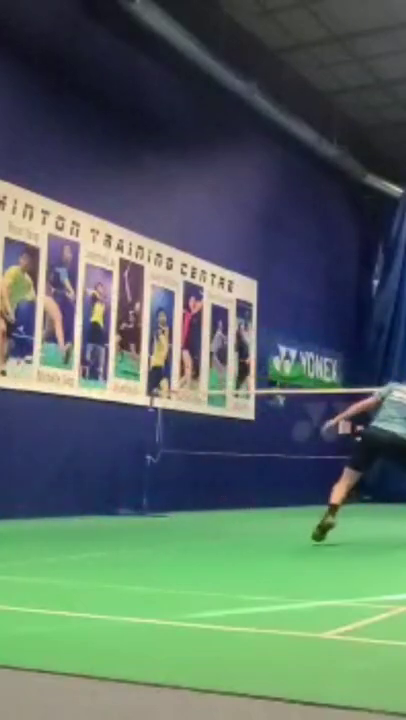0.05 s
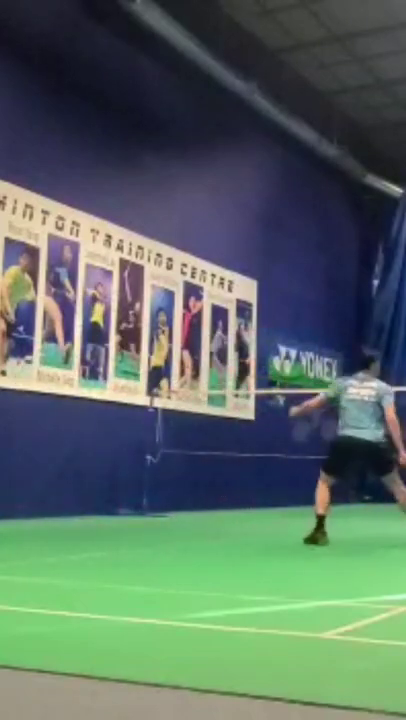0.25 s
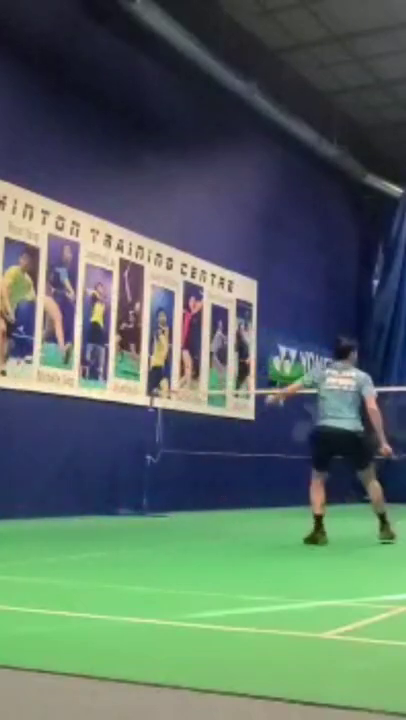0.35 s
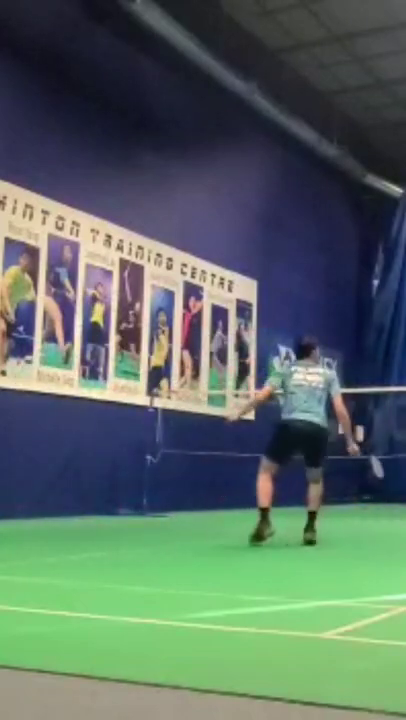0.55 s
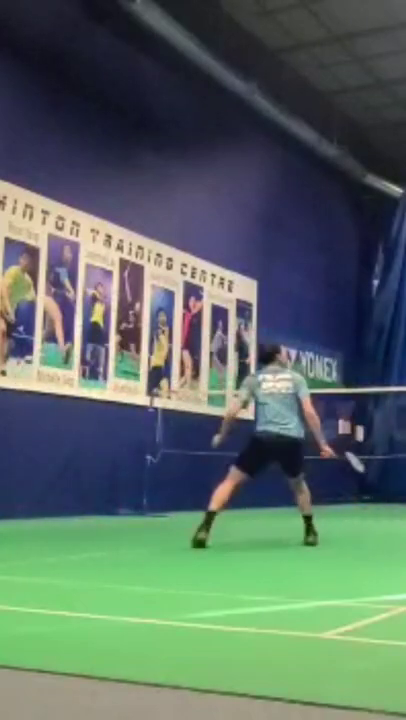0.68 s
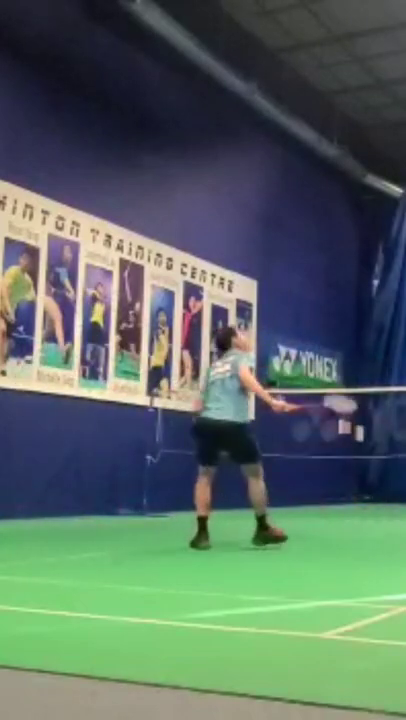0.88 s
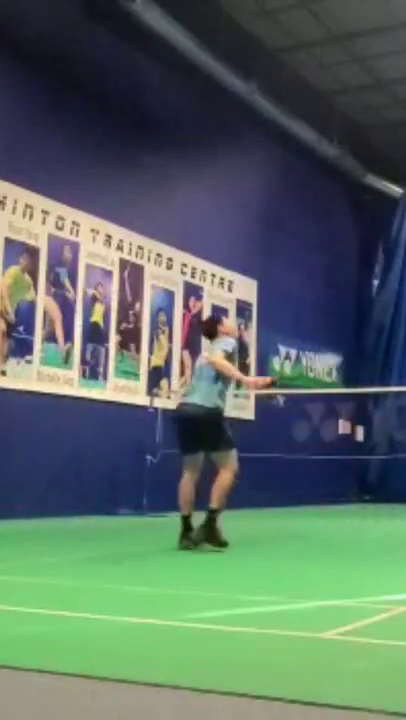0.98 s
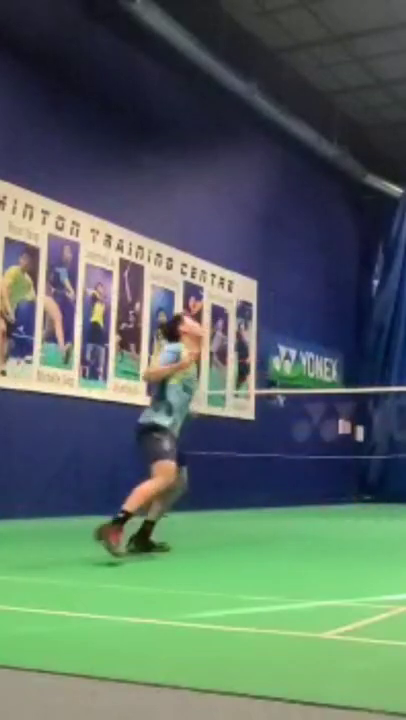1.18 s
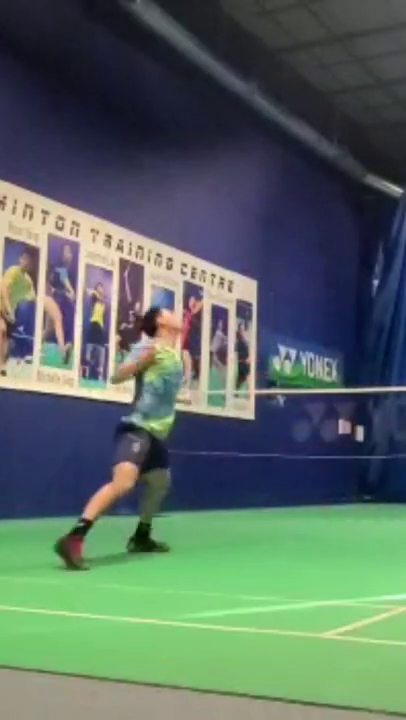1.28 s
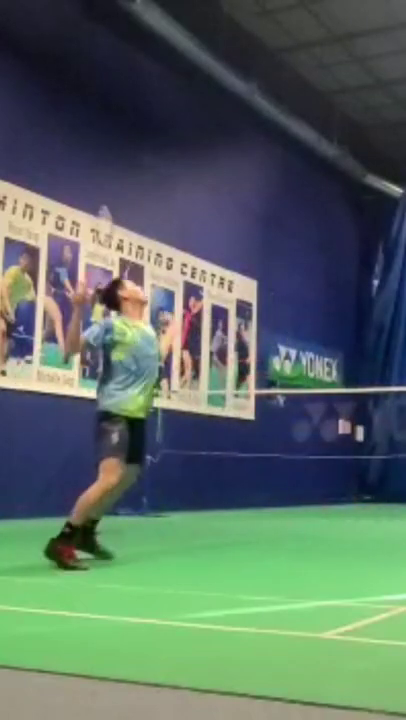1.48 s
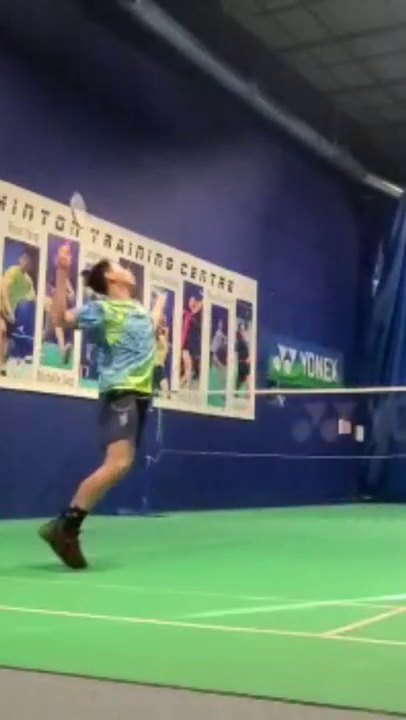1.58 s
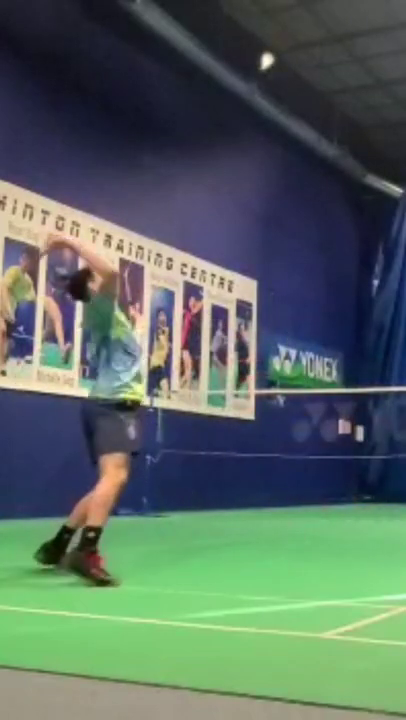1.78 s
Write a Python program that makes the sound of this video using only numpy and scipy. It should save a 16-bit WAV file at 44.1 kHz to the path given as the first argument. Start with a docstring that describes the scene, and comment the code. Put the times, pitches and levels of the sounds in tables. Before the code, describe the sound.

Rubber soles squeak twice on a sports hall floor, with footfalls and a badminton racket hit in between. Softer steps and a faint scuff follow, all ringing in the reverberant room while ventilation rumbles quietly.

```python
"""Footwork in an indoor sports hall. Ventilation rumbles throughout; at the start the strings of an
earlier stroke still ring. A rubber sole sticks and slips in a squeak at 0.2 s, then feet thud.
At 0.65 s a racket knocks over a faint squeak. Soles brush the floor, squeak longer at 1.2 s,
then thud and brush again. The hall answers each with early echoes and a long tail,
and a gain control ducks the loud moments."""
import sys
import numpy as np
from scipy import signal
from scipy.fft import irfft
from scipy.io import wavfile
from scipy.ndimage import uniform_filter1d

SR = 44100
rng = np.random.default_rng(int(sys.argv[2]) if len(sys.argv) > 2 else 0)


def put_to_file(sound):
    """Save the sound as 16-bit audio at rate SR, in the file named by the first command-line argument."""
    columns = np.atleast_2d(sound).T  # one column per channel
    safe = np.clip(columns, -1, 1)
    whole_steps = np.round(safe * 32767)
    wavfile.write(sys.argv[1], SR, whole_steps.astype(np.int16))


N = 81585


def amp(db):
    return 10 ** (np.asarray(db) / 20)


def unit_rms(x):
    return x / np.sqrt(np.mean(x ** 2) + 1e-20)


def at_hz(table, hz):
    f, value = np.transpose(table)
    return np.interp(np.log(hz + 1), np.log(f + 1), value)


def add(mix, start_s, sound):
    part = mix[round(start_s * SR):][:len(sound)]
    part += sound[:len(part)]


def eq_taps(table, scale=1):
    gain_db = scale * at_hz(table, np.fft.rfftfreq(256, 1 / SR))
    return np.fft.fftshift(irfft(amp(gain_db)))


# Diffuse field: f/Hz, left-right coherence
COHERENCE = [(50, 0.97), (150, 0.89), (300, 0.84), (600, 0.1), (1500, 0.092), (10000, 0.033)]


def diffuse_noise(frame):
    """Stereo noise spectra, alike in the bass and independent in the treble."""
    f, t, (left, other) = signal.stft(rng.standard_normal((2, N)), SR, nperseg=frame)
    shared = np.clip(at_hz(COHERENCE, f), 0, 1)[:, None]
    return f, t, np.array([left, shared * left + np.sqrt(1 - shared ** 2) * other])


# Rumble spectrum: f/Hz, relative level/dB
RUMBLE = [(12, -37), (20, -8.5), (64, -1.5), (147, -16.5), (655, -17), (1050, -23), (1200, -19.5),
          (1880, -25), (2210, -21.5), (3640, -30), (5370, -39.5), (11700, -52), (15000, -97)]
# Hum tones: f/Hz, level/dB
HUM_TONES = [(73, -50.5), (120, -51.5)]


def ventilation(rumble_db=-45):
    """Air rumble and far hall noise with a wavering hum."""
    f, _, spectra = diffuse_noise(2048)
    rumble = signal.istft(spectra * amp(at_hz(RUMBLE, f))[:, None], SR, nperseg=2048)[1][:, :N]
    hum = sum(amp(db) * wavering_tone(hz) for hz, db in HUM_TONES)
    return amp(rumble_db) * unit_rms(rumble) + hum


def wavering_tone(hz):
    drift_rad = 0.015 * np.cumsum(rng.standard_normal(N))
    return np.sin(2 * np.pi * hz * np.arange(N) / SR + drift_rad)


def lingering_strings(hz=1185, db=-49.5, t60_s=1.2):
    """Strings of an earlier stroke dying away in the hall."""
    t = np.arange(N) / SR
    return amp(db - 60 * t / t60_s) * np.array([wavering_tone(hz), wavering_tone(hz)])


# One curve per squeak: t/s, slip f/Hz, level/dB, overtone lift/dB (clipped to +-6)
SQUEAK_CURVES = [
    [(.209, 2200, -48, 6), (.216, 2290, -28, 5), (.2195, 2340, -17, -1), (.2235, 2400, -11, -5),
     (.2255, 2640, -17, -2), (.228, 2540, -9, -2), (.2335, 2520, -23, 5), (.241, 2440, -38, 3)],
    [(.658, 1895, -52, -8), (.668, 1970, -46, 32), (.69, 1966, -42.5, -8), (.71, 1960, -58, -3)],
    [(1.177, 1864, -64, -5), (1.182, 1954, -38.5, 15.5), (1.19, 1906, -34.5, -33), (1.195, 1843, -54, -13),
     (1.201, 1985, -62, 2), (1.212, 1880, -63, 6)],
    [(1.181, 2544, -27, 5), (1.188, 2430, -28.5, -19), (1.196, 2339, -22.5, -15), (1.212, 2424, -18, -15.5),
     (1.224, 2508, -14, 3.5), (1.236, 2766, -23.5, 9.5), (1.25, 2698, -24, -3.5), (1.264, 2700, -24, -3),
     (1.28, 2773, -24, -10), (1.3, 2792, -27, 2)],
]
# One row per squeak, harmonics 2, 3, ...: level/dB re fundamental, before lift
SQUEAK_OVERTONES = [
    [-13, -22, -29, -31.5],
    [-11, -48],
    [-1.5, -3, -18, -41, -31],
    [-10, -17, -19.5, -12.5, -20],
]


def squeak(curve, overtones_db, wobble=0.012, chatter_db=3, grit_db=-19, fade_s=0.0012):
    """Stick-slip of rubber: a gliding, chattering harmonic stack with rubbing noise."""
    times_s, hz, db, lift_db = np.transpose(curve)
    t = np.arange(times_s[0], times_s[-1], 1 / SR)
    noise = rng.standard_normal((3, len(t)))
    waver, grab = (unit_rms(uniform_filter1d(uniform_filter1d(v, 80), 80)) for v in noise[:2])
    phase = 2 * np.pi * np.cumsum(np.interp(t, times_s, hz) * (1 + wobble * waver)) / SR
    overtones = sum(amp(d) * np.sin((k + 2) * phase + k) for k, d in enumerate(overtones_db))
    grit = amp(grit_db + max(overtones_db)) * noise[2] * (1 + np.sin(phase))
    lift = amp(np.clip(np.interp(t, times_s, lift_db), -6, 6))
    fade = np.clip(np.minimum(t - times_s[0], times_s[-1] - t) / fade_s, 0, 1)
    envelope = fade * amp(np.interp(t, times_s, db) + chatter_db * grab)
    return envelope * np.sqrt(2) * (np.sin(phase) + lift * (overtones + grit))


# Foot and racket impacts: t/s, level/dB, body f/Hz, then re body: crack/dB, ring/dB, tick/dB
IMPACTS = [(0.29, -25, 386, -8, -39, -60), (0.308, -31, 600, -20, -46, -47),
           (.327, -32.5, 500, -9, -41, -50), (.345, -24.5, 840, -32, -43, -56),
           (.635, -24.5, 520, -5, -45, -12.5), (0.6557, -21.5, 454, -15, -7, -30),
           (.6583, -21, 680, -24, -24, -40), (.672, -26.5, 1080, -11, -41, -36),
           (0.741, -32.5, 436, -30, -33, -50), (1.173, -49, 190, -22, -37, -50),
           (1.385, -35.5, 231, -36, -40, -50), (1.422, -26, 720, -33, -36, -50),
           (1.504, -60.5, 789.7, -33, -31, -42), (1.764, -37, 308, -32, -54, -50)]
# Racket string modes: f/Hz, level/dB re ring, t60/s
STRING_MODES = [(1262, -1, 0.043), (754, -13, 0.028)]


def thud(db, body_hz, crack_db, ring_db, tick_db, crack_hz=3180, crack_s=0.012, tick_s=0.00084):
    """One push and rebound of air, a crack, a bright tick and a string ring, strong for the racket."""
    t = np.arange(4000) / SR
    half_cycles = 2 * body_hz * t
    body = np.sin(np.pi * half_cycles) * np.exp(-(half_cycles / 1.74) ** 2)
    body *= np.minimum(2 * half_cycles, 1)
    dull_noise = signal.lfilter(*signal.butter(1, crack_hz, fs=SR), rng.standard_normal(len(t)))
    crack = amp(crack_db) * dull_noise * np.exp(-t / crack_s)
    tick = amp(tick_db) * np.diff(rng.standard_normal(len(t) + 1)) * np.exp(-t / tick_s)
    ring = sum(amp(ring_db + mode_db - 60 * t / t60_s) * np.sin(2 * np.pi * hz * t)
               for hz, mode_db, t60_s in STRING_MODES)
    return amp(db) * (body + crack + ring + tick)


# Sole brushes: t/s, length/s, level/dB
SOLE_SCUFFS = [(0.802, .07, -64), (1.037, 0.1, -71), (1.61, 0.25, -55.5)]


def scuff(length_s, db, highpass_hz=6030):
    """A sole brushes the floor: grainy hiss that rises quickly and trails off."""
    progress = np.linspace(0, 1, round(length_s * SR))
    grains = rng.standard_normal(len(progress)) * amp(3.6 * rng.exponential(1, len(progress)))
    hiss = signal.sosfilt(signal.butter(2, highpass_hz, "high", fs=SR, output="sos"), grains)
    return amp(db) * unit_rms(hiss) * np.sin(np.pi * np.sqrt(progress))


# Source balance: f/Hz, left minus right/dB
BALANCE = [(300, 0.5), (2500, 0.5), (5000, 12), (9000, 4), (13000, 3.5)]
# Early echoes: delay/s, left/dB, right/dB, right lag/samples
EARLY_ECHOES = [(.0045, -9, -9, 3), (.012, -12, -9, -8), (.0195, -1, -7, 12), (.031, -13, -9, -15)]
# Tail decay: f/Hz, t60/s
TAIL_DECAY = [(100, 0.4), (400, 0.77), (1200, 1.2), (2500, 1.387), (5000, 1.25), (8000, 0.7), (13000, 0.42)]
# Tail spectrum: f/Hz, relative level/dB
TAIL_SPECTRUM = [(300, 2), (2500, -2), (6000, 0.5), (10000, 1), (14000, -6.5)]


def hall(x, wet_db, echo_db=0, right_lag_samples=4, tail_rise_s=0.019, tail_lean=0.42):
    """Direct sound leaning left, early echoes, then a diffuse tail dying band by band."""
    left, right = (signal.oaconvolve(x, eq_taps(BALANCE, side), "same") for side in (0.5, -0.5))
    early = np.array([left, np.roll(right, right_lag_samples)])
    for delay_s, left_db, right_db, lag_samples in EARLY_ECHOES:
        add(early[0], delay_s, amp(left_db + echo_db) * left)
        add(early[1], delay_s + lag_samples / SR, amp(right_db + echo_db) * right)
    f, t, spectra = diffuse_noise(512)
    spectra *= amp(at_hz(TAIL_SPECTRUM, f)[:, None] - 60 * t / at_hz(TAIL_DECAY, f)[:, None])
    spectra *= amp(np.outer([0.5, -0.5], tail_lean * at_hz(BALANCE, f)))[:, :, None]
    tail = signal.istft(spectra, SR, nperseg=512)[1][:, :N]
    tail *= np.minimum(np.arange(N) / SR / tail_rise_s, 1) ** 2
    tail *= np.sqrt(2) / np.linalg.norm(tail)
    return early + amp(wet_db) * signal.fftconvolve(x[None], tail, axes=1)[:, :N]


def scene():
    """Soles and impacts in the hall, over the ventilation and the lingering strings."""
    soles, impacts = np.zeros((2, N))
    for curve, overtones_db in zip(SQUEAK_CURVES, SQUEAK_OVERTONES):
        add(soles, curve[0][0], squeak(curve, overtones_db))
    for start_s, length_s, db in SOLE_SCUFFS:
        add(soles, start_s, scuff(length_s, db))
    for start_s, *impact in IMPACTS:
        add(impacts, start_s, thud(*impact))
    play = hall(soles, wet_db=3) + hall(impacts, wet_db=4.5, echo_db=-7)
    return play + ventilation() + lingering_strings()


def gain_control(x, knee_db=-28.5, slope=0.23, sense_s=0.051, release_db_per_s=63):
    """Ducks both channels by a share of the held level above the knee."""
    pole = np.exp(-1 / (sense_s * SR))
    power_db = 10 * np.log10(signal.lfilter([1 - pole], [1, -pole], (x ** 2).mean(0)) + 1e-12)
    fall_db = np.arange(N) * release_db_per_s / SR
    held_db = np.maximum.accumulate(power_db + fall_db) - fall_db
    over_db = np.maximum(held_db - knee_db, 0)
    return x / amp(slope * uniform_filter1d(over_db, size=400))


# Microphone response: f/Hz, gain/dB
MIC_RESPONSE = [(100, -0.5), (9000, 0.5), (12000, -4), (13500, -9.5), (14300, -19), (15000, -26)]


def record(dry):
    """Gain control, microphone colour, then a steep band limit."""
    coloured = signal.oaconvolve(gain_control(dry), eq_taps(MIC_RESPONSE)[None], "same")
    lowpass = signal.firwin(511, cutoff=14850, window=("kaiser", 9), fs=SR)
    return signal.oaconvolve(coloured, lowpass[None], "same")


dry = scene()
out = record(dry)
put_to_file(out)
```